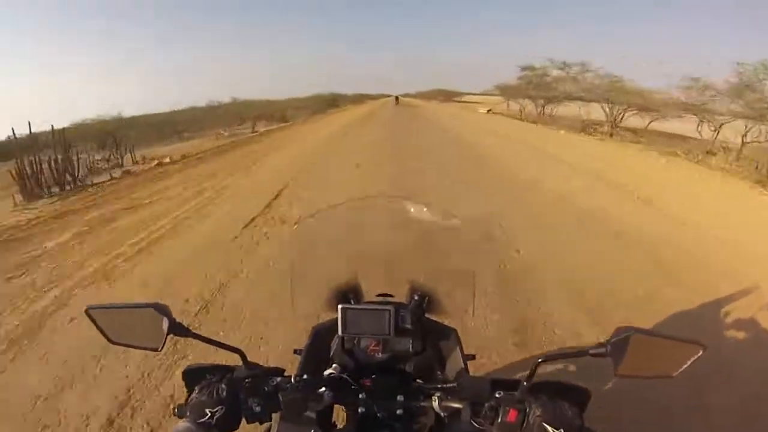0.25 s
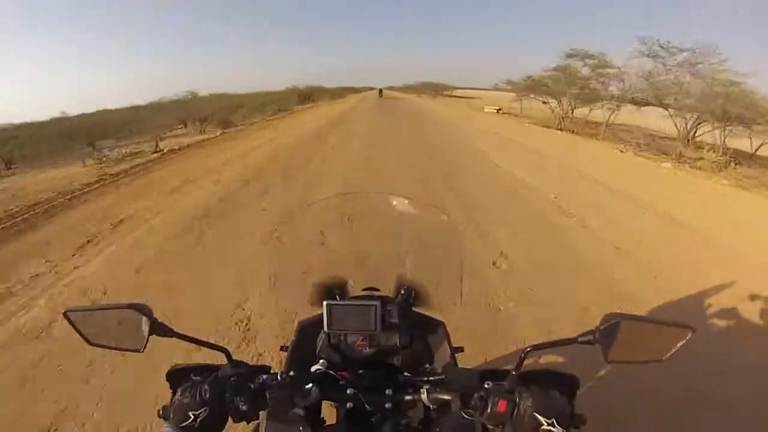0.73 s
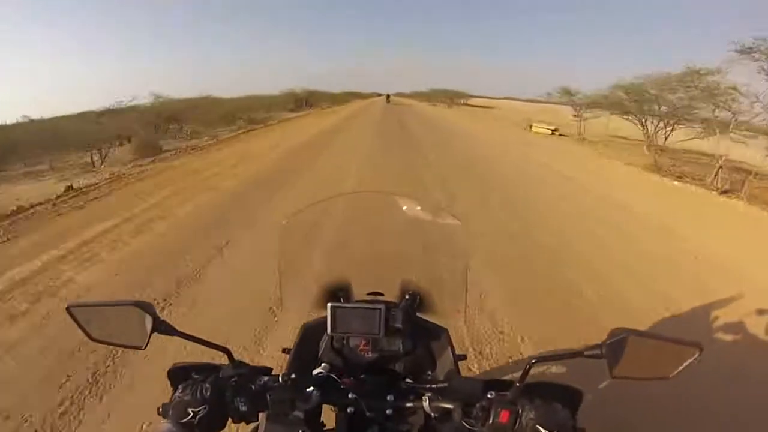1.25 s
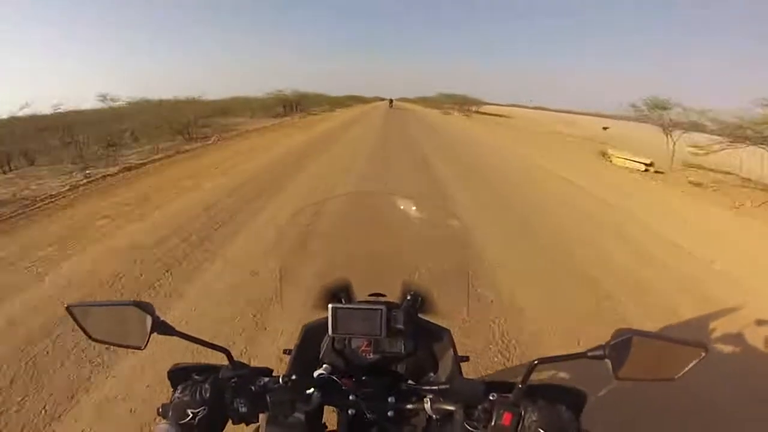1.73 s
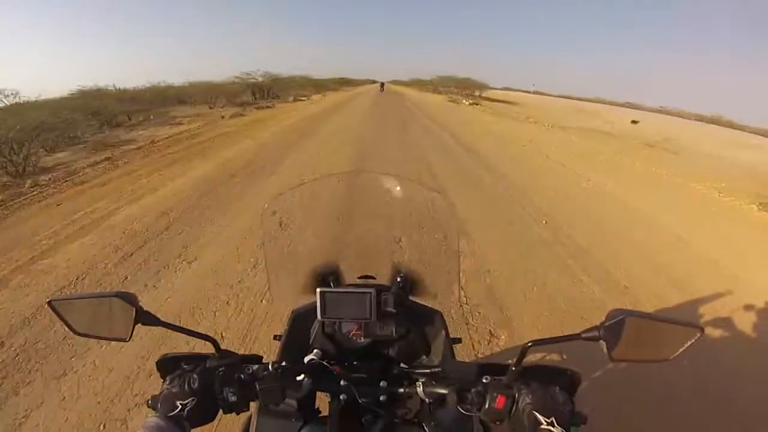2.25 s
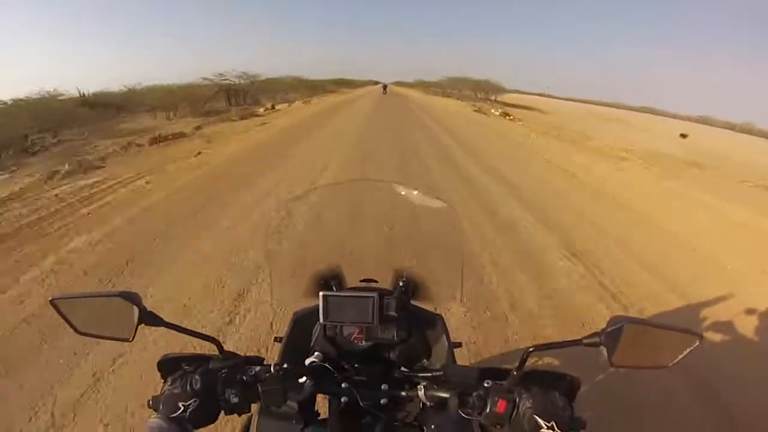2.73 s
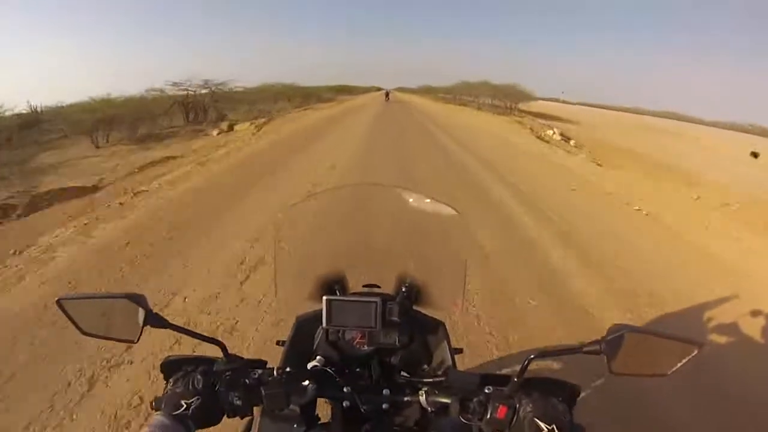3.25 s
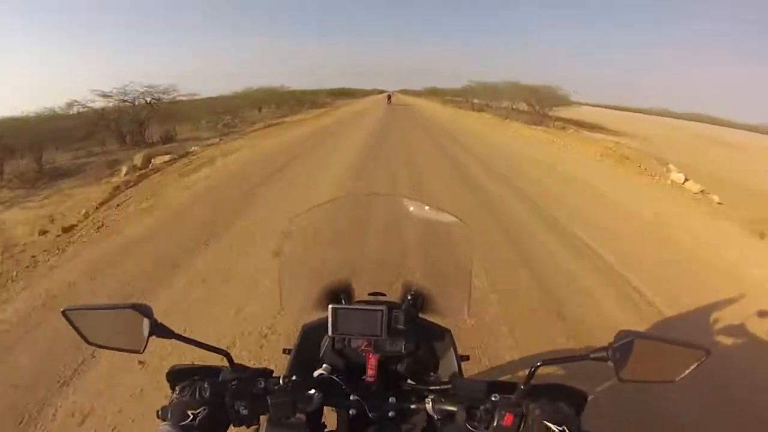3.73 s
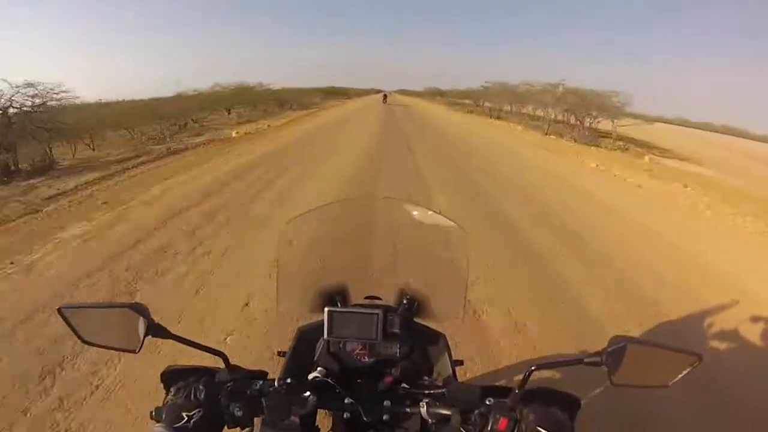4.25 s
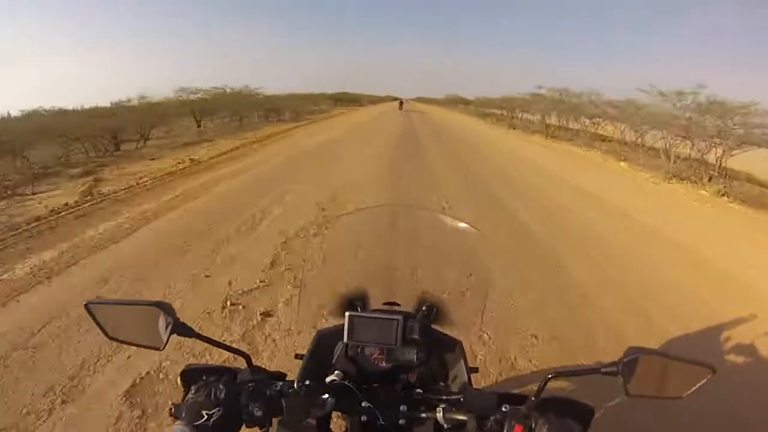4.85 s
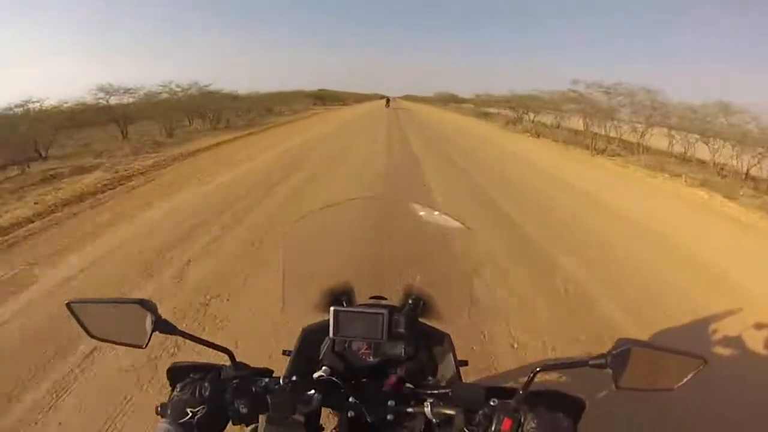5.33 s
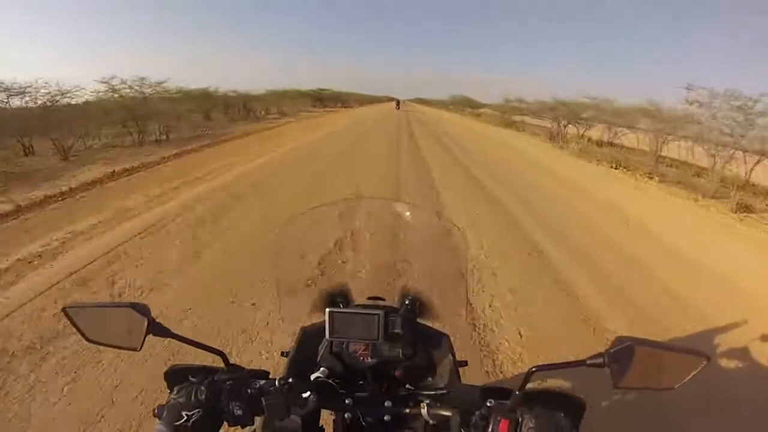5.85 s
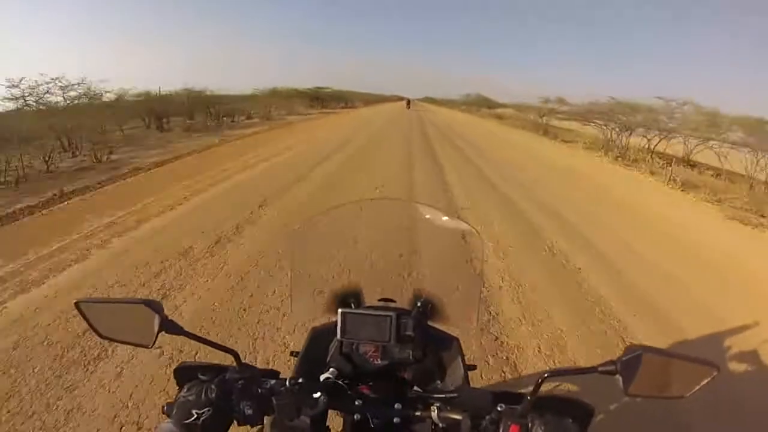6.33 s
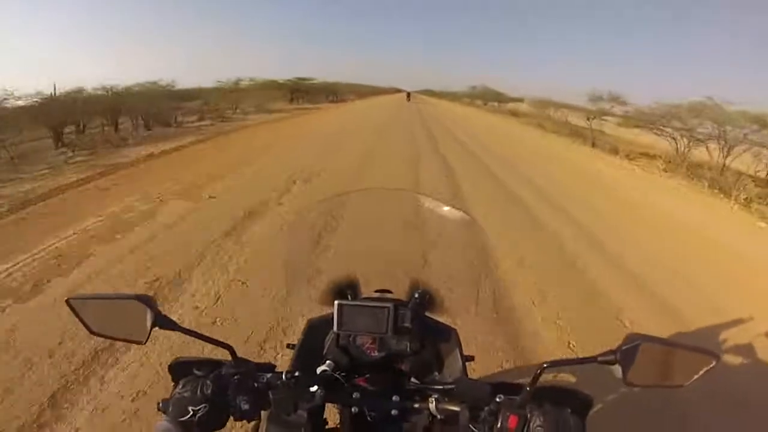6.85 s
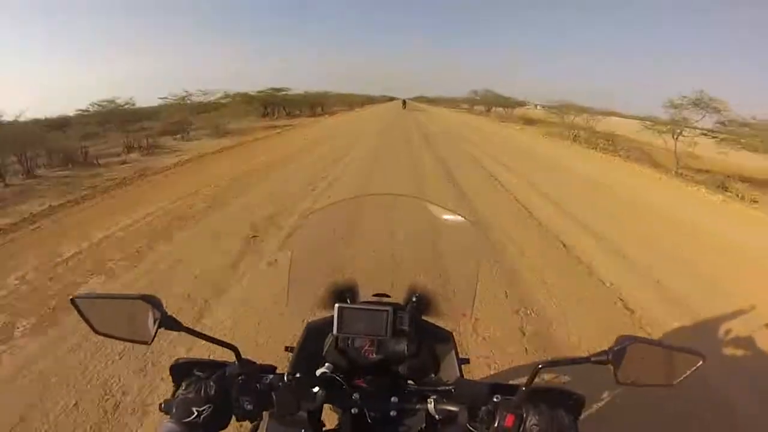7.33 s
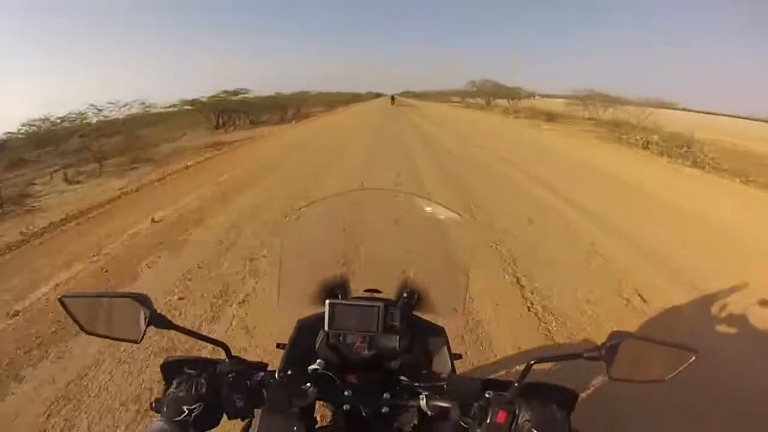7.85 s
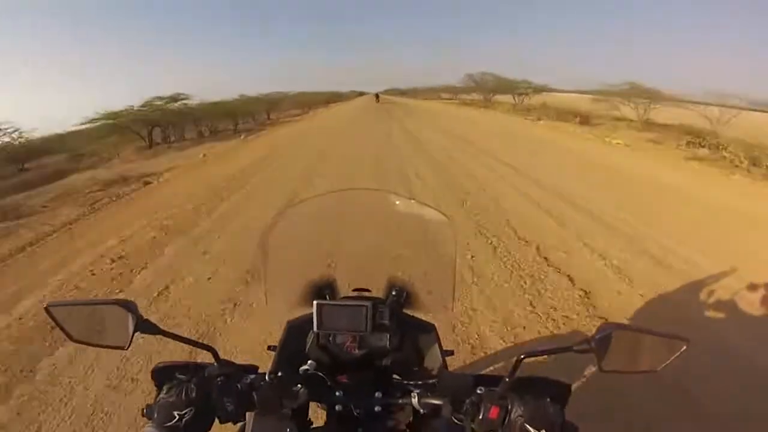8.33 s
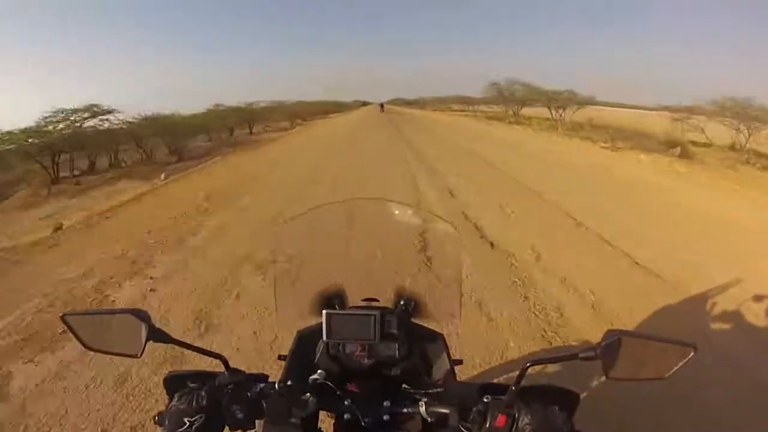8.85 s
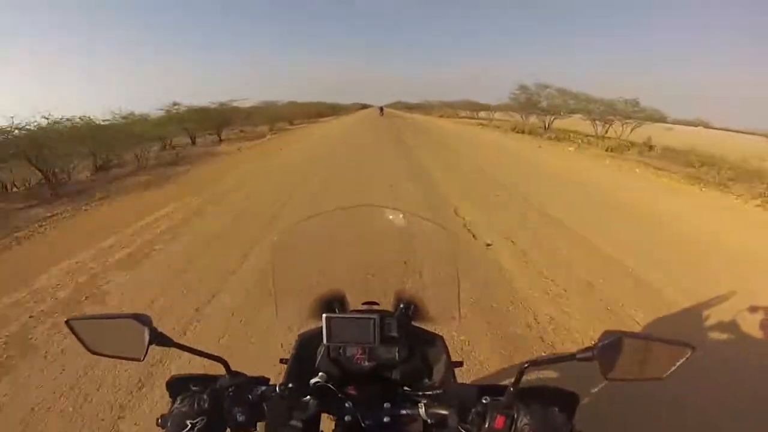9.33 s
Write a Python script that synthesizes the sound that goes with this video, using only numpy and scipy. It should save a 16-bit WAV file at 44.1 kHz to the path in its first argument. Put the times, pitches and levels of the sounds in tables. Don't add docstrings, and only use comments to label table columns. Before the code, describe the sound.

Close, enclosed microphone on a motorcycle rider's helmet on an open dirt road. Turbulent wind hisses loudly and coarsely, broken by tiny gaps and fluttering gusts. Beneath it, low engine throb and buffeting swell in irregular bassy pulses, with dull thumps from bumps. Around two seconds the hiss flutters rapidly and regularly; after seven seconds the bass pulses stop and the wind eases, until a final thump and surge.

```python
import sys
import numpy as np
from scipy import signal
from scipy.fft import rfft, irfft, next_fast_len
from scipy.io import wavfile
from scipy.ndimage import uniform_filter1d, map_coordinates

SR = 44100
rng = np.random.default_rng(int(sys.argv[2]) if len(sys.argv) > 2 else 0)


def level_to_linear(level):
    exponent = np.asarray(level, float) / 20
    return 10 ** exponent


def wav_record(signal):
    frames = np.transpose(np.atleast_2d(signal))
    bounded = np.clip(frames, -1, 1)
    quanta = np.round(bounded * 32767).astype(np.int16)
    wavfile.write(sys.argv[1], SR, quanta)


N = 423360

# [t/s, hiss level/dB]
AIRFLOW = [(0.0, -29), (0.35, -21), (0.53, -32), (0.91, -25), (1.2, -31.5), (1.4, -24), (2.04, -28),
           (2.3, -36.5), (2.86, -26.5), (3.26, -34), (3.85, -24.5), (4.3, -30), (4.58, -24), (4.8, -29),
           (7.5, -30.5), (7.9, -36.5), (9.2, -32), (9.6, -28)]
# [t/s, rise/dB, length/ms]
GUSTS = [(0.757, 7, 31), (2.253, 8, 40), (2.467, 22, 16.7), (3.4, 2.5, 140), (3.64, 2, 65), (4.07, 3, 46),
         (5.063, 4.5, 130), (5.65, 20, 22), (6.263, 5, 50), (7.493, 3.5, 110), (8.053, 7, 140),
         (8.437, 10, 20), (8.707, 4.5, 70), (8.94, 2.5, 133), (9.077, 2.4, 73), (9.293, 8, 20),
         (9.55, 3, 90)]
# [t/s, change/dB, length/ms]
LULLS = [(0.463, -7.5, 31), (0.657, -8.5, 28), (0.807, -10.5, 17), (1.187, -29, 6), (1.247, -5.5, 24),
         (1.493, -5, 48), (2.117, -5, 57), (2.597, -9, 15), (3.18, -15, 13), (3.46, -12, 10.5),
         (3.493, -11, 25), (3.587, -7.2, 14), (3.697, -6.5, 32), (4.143, -11, 14.8), (4.697, -3.5, 69),
         (4.853, -5.4, 27), (4.947, -11, 5.5), (5.143, -20, 10), (5.453, -8, 9), (6.477, -4.5, 47),
         (6.607, -3, 140), (7.153, -2.5, 130), (7.757, -4, 18), (7.92, -9, 72), (8.283, 2, 10),
         (8.323, -12, 12.8), (8.64, -4.5, 40), (9.157, -5, 60), (9.32, 20, 10.3), (9.463, -12, 57)]
# [first t/s, count/1, change/dB]
VORTEX_TRAINS = [
    (2.249, 28, -3.5),
    (9.053, 11, -5.5),
]
# [f/Hz, width/Hz, level/dB]
SHELL_MODES = [(1225, 97, -10), (1930, 880, -8.5), (2089, 222, -3.5), (2627, 170, -2), (3076, 288, -2.5),
               (3675, 190, -8), (4527, 136, -8.5), (5497, 430, -9), (6300, 730, -15.5), (7040, 380, -21),
               (7300, 400, -32.5), (8900, 940, -19.5)]
# [f/Hz, density/dB per Hz]
HISS_SPECTRUM = [(500, -35), (900, -33.5), (1500, -37.5), (3000, -21), (4200, -23), (8000, -29),
                 (11000, -33), (12400, -31.5), (13600, -35), (14000, -36), (14700, -42), (15200, -41)]
# [t/s, peak level/dB, length/ms, f/Hz]
SURGES = [(0.32, -19, 120, 74.4), (0.33, -25, 19, 70.5), (0.93, -19.5, 140, 79.9), (1.087, -21, 33, 77.16),
          (1.37, -22.5, 160, 73.2), (1.497, -31, 23.6, 80), (1.73, -21.5, 18, 72.2),
          (2.023, -27, 120, 78.1), (2.321, -35, 120, 76.7), (2.496, -22, 40, 75.5), (2.75, -23, 76, 75.8),
          (3.045, -21.5, 42, 71.9), (3.442, -24.2, 55, 75.9), (3.557, -18, 73.5, 77.6),
          (3.818, -17.5, 72, 75.1), (4.03, -38, 31, 71.87), (4.117, -24.5, 233, 75.4),
          (4.582, -25, 39, 79.0), (4.773, -25.5, 170, 76.36), (4.777, -8.5, 25, 74.86),
          (5.03, -22, 66, 72.9), (5.317, -19.5, 165, 75.0), (5.673, -24.5, 116, 78.4),
          (5.887, -26.4, 39, 78), (6.111, -20.5, 36, 79.8), (6.45, -13, 32.4, 78.4),
          (6.642, -17.5, 82, 74.96), (6.84, -26.5, 188, 74), (9.272, -26.2, 29, 71.9),
          (9.56, -21.5, 61.4, 78.2)]
# [t/s, change/dB, length/ms]
STUMBLES = [(0.697, -18, 92), (0.827, -18, 120), (1.043, -7, 89), (1.173, -13, 56), (1.563, -1, 46),
            (1.653, 5, 71), (2.433, -2, 33), (2.613, -3, 61), (2.843, -32, 33), (3.483, -6, 28),
            (3.69, -4, 19.5), (3.74, -10, 62), (3.957, -4, 58), (4.33, -14, 46), (4.947, -2, 45),
            (5.217, -6, 57), (5.493, -11, 70), (5.783, -3, 79), (6.197, -15, 52), (6.35, -13, 36),
            (6.523, -2, 30), (6.583, -14, 30), (6.743, -43, 75), (7.647, -3, 88), (7.8, -13, 43),
            (8.28, 0, 106), (8.447, -22, 60), (8.707, -6, 65), (8.817, 7, 48), (9.483, -11, 44)]
# [t/s, peak level/dB, f/Hz]
JOLTS = [(0.187, -8, 72.7), (0.275, -32, 72.7), (0.85, -14, 76), (1.221, -17, 99), (1.327, -76, 78),
         (1.427, -16.5, 95.3), (1.663, -22, 99), (1.826, -46, 90.7), (2.07, -18.5, 90.5), (2.161, -25, 105),
         (2.53, -24, 112.7), (2.722, -61, 72.7), (2.883, -16, 72), (3.81, -19, 75.4), (4.03, -11, 73.1),
         (4.23, -65, 71), (5.044, -40, 72.1), (5.279, -12, 78.55), (5.436, -34, 74.4), (5.553, -17, 88.8),
         (5.632, -25, 88.7), (5.701, -17, 76.6), (6.248, -62, 71.7), (6.365, -15.5, 74.8),
         (6.52, -24, 73.7), (9.295, -26, 82.7)]
# [t/s, level/dB]
SHAKING = [(0.0, -30.5), (0.72, -31.5), (0.91, -32), (2.59, -32.5), (7.11, -36), (7.17, -35), (7.3, -33.5),
           (8.08, -38.5), (8.74, -34), (8.82, -35), (9.52, -37), (9.6, -29)]
# [f/Hz, density/dB per Hz]
BUFFET_SPECTRUM = [(5, -17), (15, 6.5), (30, 4), (55, 8.5), (80, 10), (120, -2), (200, -80), (500, -120)]
# [f/Hz, density/dB per Hz]
RUMBLE_SPECTRUM = [(60, -6), (100, 0), (170, -3), (250, -11), (400, -16.5), (600, -21), (900, -31.5),
                   (1500, -23.5), (4000, -61), (9000, -120)]

GUST_TOP_DB = 3.5
VORTEX_PERIOD_S, VORTEX_MS, VORTEX_SCATTER_DB = 0.05, 20, 1.5
STRAY_COUNT, STRAY_MS = 110, 9
STRAY_DB, STRAY_DB_PER_WEAK_DB = -5.5, 0.44
LEAK_DB = -55
THROB_HZ, THROB_DB, STUMBLE_DB = 75, -35, 2.5
CHOP_DB = 3
MOUNT_LIMIT = 0.13
BUFFET_DB, BUFFET_SWING_DB = -0.5, 0.8
RUMBLE_DB, RUMBLE_SWING_DB = -36.5, 0.2
RUMBLE_DB_PER_AIR_DB, RUMBLE_DB_PER_SHAKE_DB = 0.4, 0.15
SELF_NOISE_DB, CEILING, TOP_HZ = -72, 0.34, 15300


def hiss(flutter_db, lull_db):
    air_db = airflow()
    air = unit(level_to_linear(crest(flutter_db + lull_db)) * patchy(patchy_db=0.5)) * level_to_linear(air_db)
    sag_db = np.clip(lull_db + flutter_db, -7, 0)
    sag_share = 0.2

    def tears(rate_hz):
        return -np.maximum(wobble(rate_hz) - 0.6, 0)

    def under(hz, edge_hz):
        return 1 / (1 + (hz / edge_hz) ** 4)

    roar = filtered(air, lambda hz: shell(hz) * under(hz, 4250))
    swish = air * level_to_linear(0.049 * (air_db + 19) + sag_share / 2 * sag_db + 0.56 * tears(37))
    fizz = air * level_to_linear(0.069 * (air_db + 18) + sag_share * sag_db + 2.8 * tears(90))
    swish = filtered(swish, lambda hz: shell(hz) * (under(hz, 6400) - under(hz, 5620)))
    fizz = filtered(fizz, lambda hz: shell(hz) * (1 - under(hz, 8600)))
    leak = filtered(rng.standard_normal(N), lambda hz: shell(hz) * under(hz, 6200) ** 2)
    return level_to_linear(8.5) * (roar + level_to_linear(-2.5) * swish + level_to_linear(1.5) * fizz) + level_to_linear(LEAK_DB) * unit(leak)


def shell(hz):
    peaks = sum(level_to_linear(2 * db) / (1 + (2 * (hz - centre_hz) / width_hz) ** 2)
                for centre_hz, width_hz, db in SHELL_MODES)
    low_cut = hz ** 2 / (hz ** 2 + 900 ** 2)
    high_cut = 1 + (hz / 10500) ** 8
    return np.sqrt(peaks * low_cut / high_cut + slope(HISS_SPECTRUM)(hz) ** 2)


def airflow():
    return curves(AIRFLOW)[0] + crest(dents(GUSTS), top_db=GUST_TOP_DB)


def eddies():
    shedding = np.sin(2 * np.pi * np.cumsum(20 + 1.31 * wobble(2.1)) / SR)
    flutter_db = 0.44 * shedding + 0.35 * wobble(25) + 0.95 * wobble(60)
    flutter_db = flutter_db + 1.3 * wobble(130) + 1.82 * wobble(300)
    vortices = []
    for first_s, count, db in VORTEX_TRAINS:
        for k in range(round(count)):
            change_db = db + VORTEX_SCATTER_DB * rng.standard_normal()
            vortices.append((first_s + VORTEX_PERIOD_S * k, change_db, VORTEX_MS))
    when, depth, life = rng.uniform(size=(STRAY_COUNT, 3)).T
    air_db, = curves(AIRFLOW)
    weak_db = air_db.mean() - air_db[(when * N).astype(int)]
    stray_db = np.minimum(STRAY_DB - STRAY_DB_PER_WEAK_DB * weak_db, 0) * (0.5 + depth)
    strays = zip(when * N / SR, stray_db, STRAY_MS * (0.41 + life))
    return flutter_db, dents([*LULLS, *vortices, *strays])


def crest(db, top_db=3.5):
    return np.where(db > 0, top_db * np.tanh(db / top_db), db)


def throb():
    air_db, t = curves(AIRFLOW)[0], np.arange(N) / SR
    shake_db, = curves(SHAKING)
    size = level_to_linear(THROB_DB + 0.1 * (air_db - air_db.mean()) + STUMBLE_DB * wobble(14)
               + 0.17 * (shake_db + 36))
    pull = size * THROB_HZ
    for s, db, ms, hz in SURGES:
        near = slice(max(round((s - 0.4) * SR), 0), round((s + 0.4) * SR))
        swell = level_to_linear(db - 2) * np.exp(-0.5 * (2000 * (t[near] - s) / ms) ** 2)
        size[near] += swell
        pull[near] += swell * hz
    phase = 2 * np.pi * np.cumsum(pull / size + 5 * wobble(30)) / SR
    size *= level_to_linear(dents(STUMBLES) - CHOP_DB * np.maximum(wobble(22) - 0.4, 0))
    size = MOUNT_LIMIT * np.tanh(size / MOUNT_LIMIT)
    return size * unit(level_to_linear(1.2 * wobble(40)) * np.sin(phase))


def jolts():
    out, t = np.zeros(N + SR), np.arange(SR // 8) / SR
    for s, db, hz in JOLTS:
        swing = np.sin(2 * np.pi * hz * t + rng.uniform(0, 2 * np.pi))
        push = swing * (t / 0.015) * np.exp(1 - t / 0.0099)
        out[round(s * SR):][:len(t)] += level_to_linear(db + 1.0) * push
    return out[:N]


def road(eddy_db):
    air_db = airflow()
    swing_db = air_db - air_db.mean()
    shake_db, = curves(SHAKING)
    buffet_db = BUFFET_DB + shake_db + BUFFET_SWING_DB * wobble(5)
    rumble_db = RUMBLE_DB + RUMBLE_DB_PER_AIR_DB * swing_db + RUMBLE_SWING_DB * wobble(5)
    rumble_db = rumble_db + RUMBLE_DB_PER_SHAKE_DB * (shake_db - shake_db.mean())
    buffet = unit(filtered(rng.standard_normal(N), slope(BUFFET_SPECTRUM)))
    lumps = level_to_linear(0.24 * eddy_db + 0.55 * wobble(18))
    rumble = unit(filtered(lumps * patchy(patchy_db=0.3), slope(RUMBLE_SPECTRUM)))
    return level_to_linear(buffet_db + 6.0) * buffet + level_to_linear(rumble_db + 1.0) * rumble


def unit(x):
    return x / np.sqrt(np.mean(x ** 2) + 1e-20)


def curves(rows):
    s, *cols = np.transpose(rows)
    return [np.interp(np.arange(N) / SR, s, c) for c in cols]


def dents(rows):
    t, out = np.arange(N) / SR, np.zeros(N)
    for s, change_db, ms in rows:
        near = slice(max(round((s - 0.2) * SR), 0), round((s + 0.2) * SR))
        out[near] += change_db * np.exp(-np.abs(1700 * (t[near] - s) / ms) ** 3)
    return out


def wobble(rate_hz):
    knots = rng.standard_normal(2000 + int(N * 400 / SR))
    return map_coordinates(knots, [np.arange(N) * rate_hz / SR])


def patchy(patchy_db):
    z = signal.stft(rng.standard_normal(N), nperseg=512)[2]
    field = uniform_filter1d(rng.standard_normal(z.shape), size=8, axis=0)
    field = uniform_filter1d(field, size=6, axis=1)
    return signal.istft(z * level_to_linear(patchy_db * unit(field)), nperseg=512)[1][:N]


def filtered(x, response):
    m = next_fast_len(N + SR // 2)
    return irfft(rfft(x, m) * response(np.fft.rfftfreq(m, 1 / SR)), m)[:N]


def slope(points):
    f, db = np.transpose(points)
    return lambda hz: level_to_linear(np.interp(np.log(hz + 1), np.log(f + 1), db))


def scene():
    flutter_db, lull_db = eddies()
    mix = hiss(flutter_db, lull_db) + throb() + road(flutter_db + lull_db) + jolts()
    return mix[None]


def roll_off(x):
    return signal.sosfilt(signal.butter(12, 15560, fs=SR, output="sos"), x)


def record(dry):
    x = dry[0] + level_to_linear(SELF_NOISE_DB) * rng.standard_normal(N)
    x = x / (1 + np.abs(x / CEILING) ** 4) ** 0.25
    mix = filtered(x, lambda hz: hz < TOP_HZ)[None]
    return roll_off(mix)


dry = scene()
out = record(dry)
wav_record(out)
```